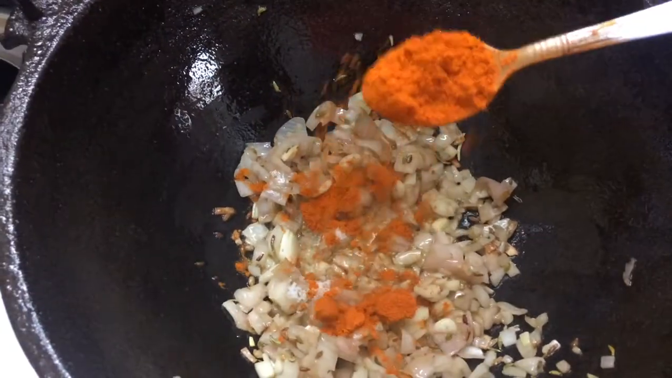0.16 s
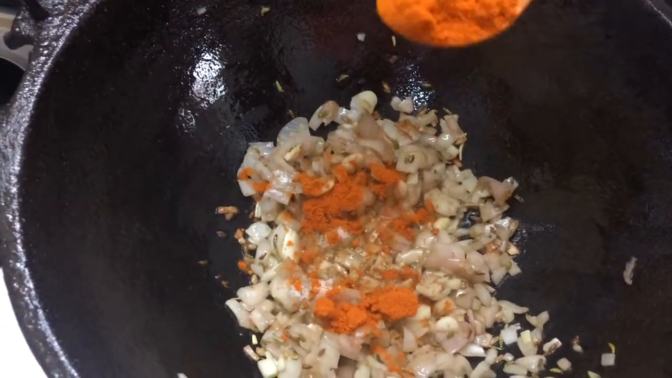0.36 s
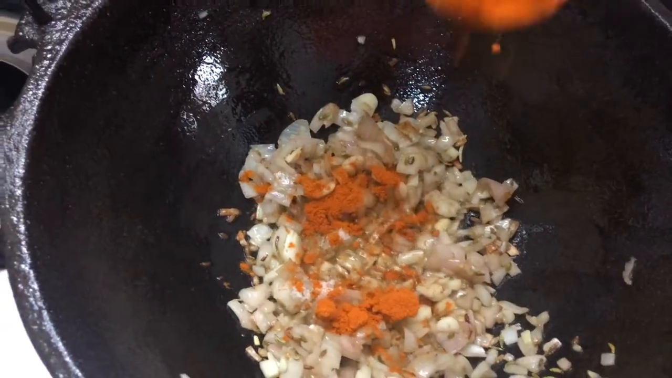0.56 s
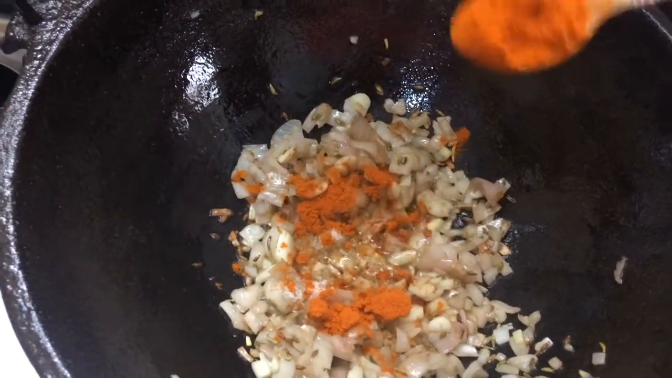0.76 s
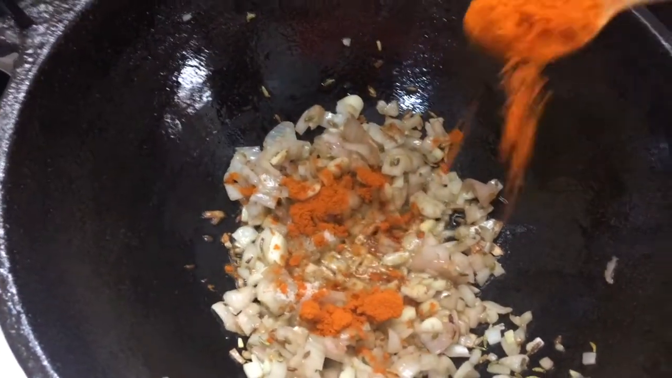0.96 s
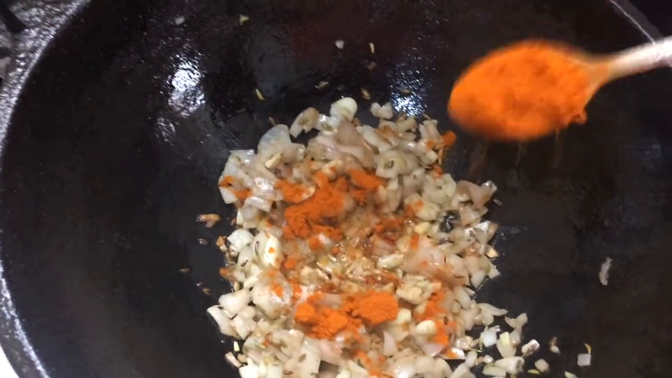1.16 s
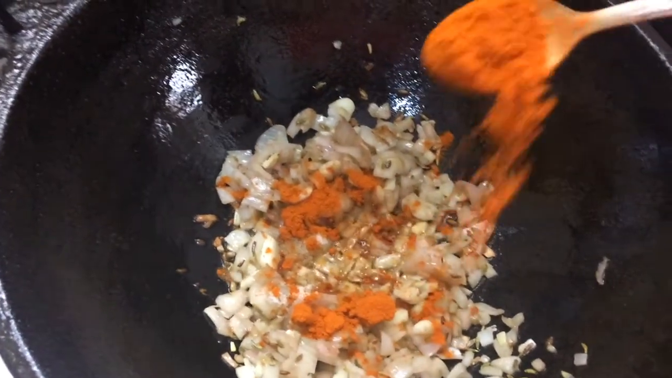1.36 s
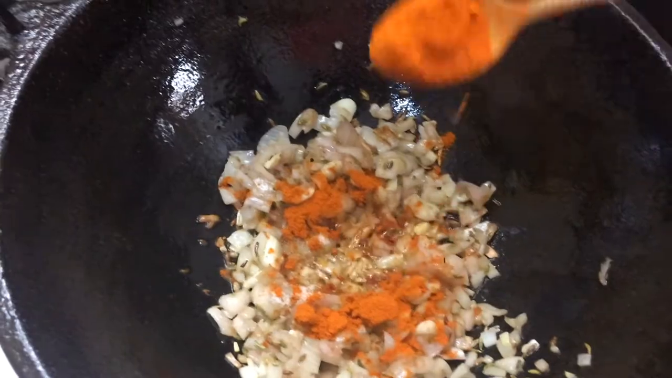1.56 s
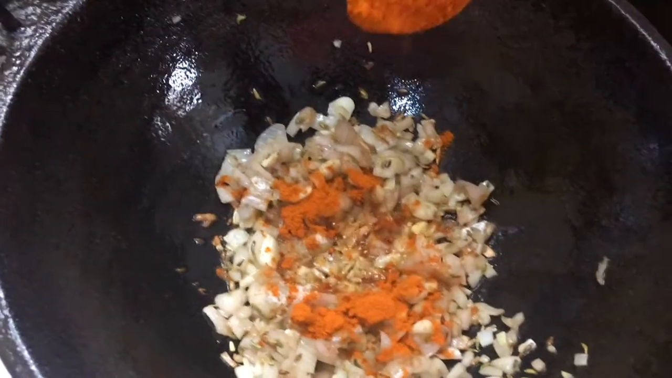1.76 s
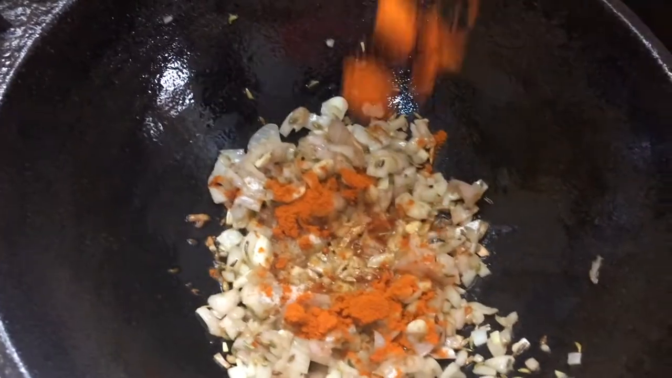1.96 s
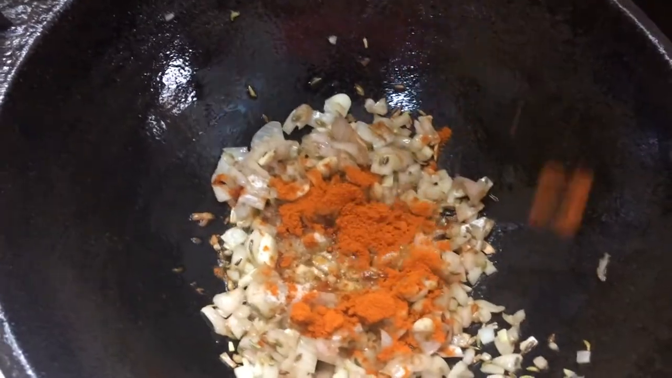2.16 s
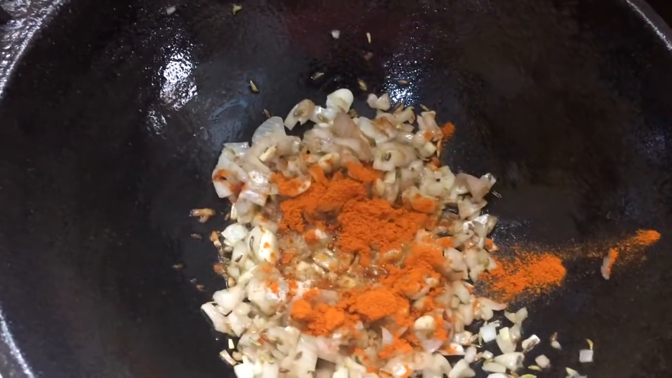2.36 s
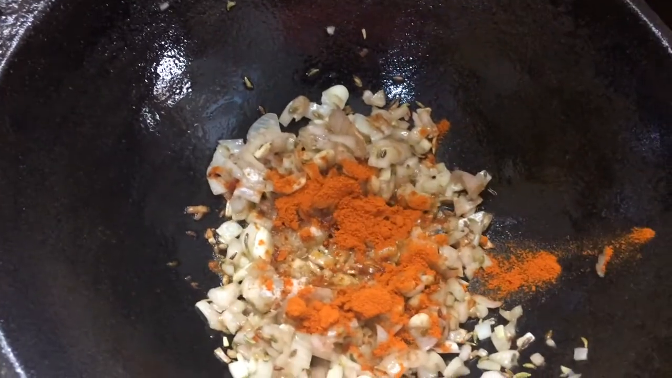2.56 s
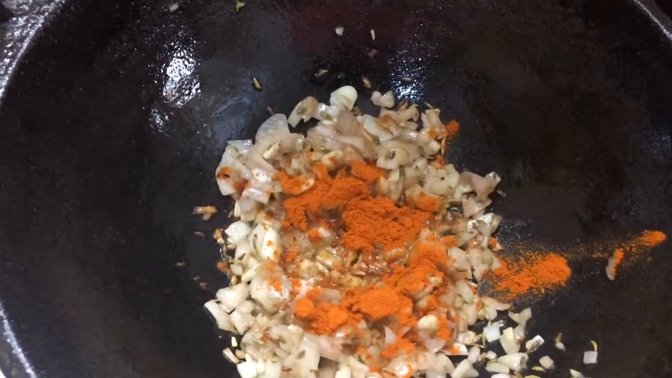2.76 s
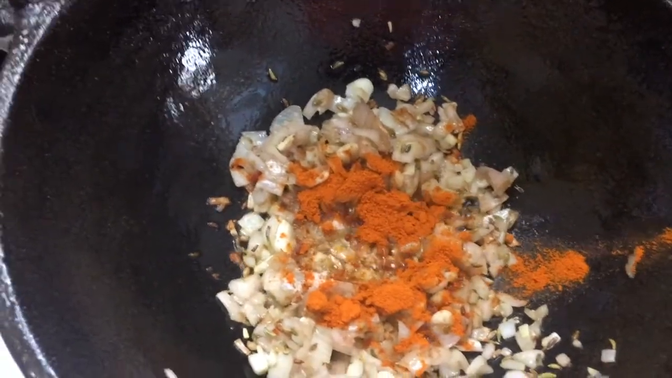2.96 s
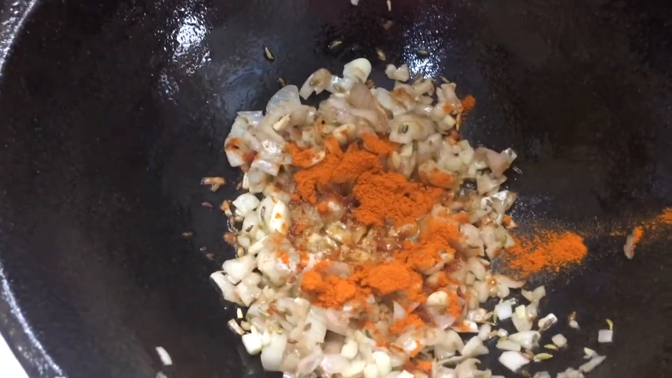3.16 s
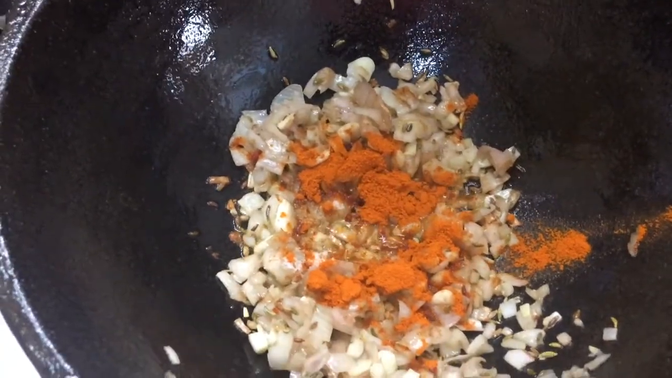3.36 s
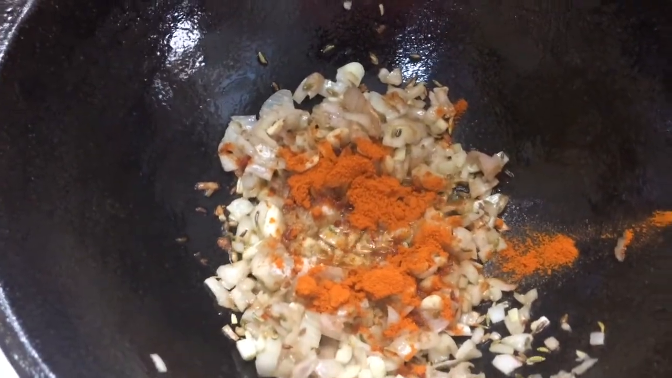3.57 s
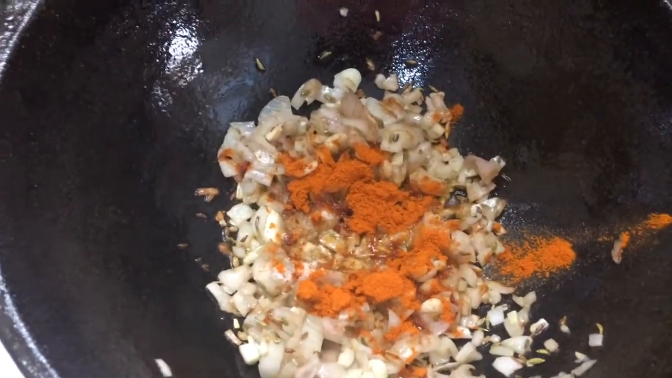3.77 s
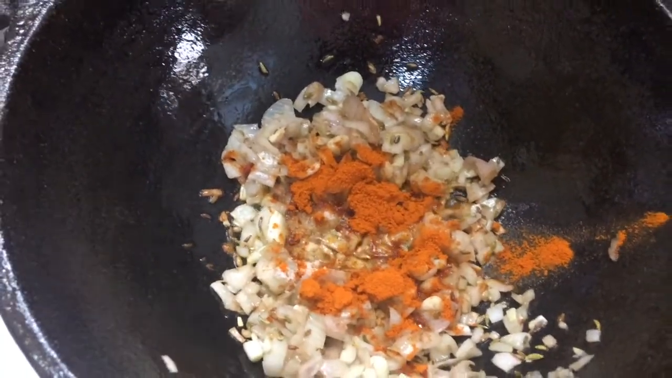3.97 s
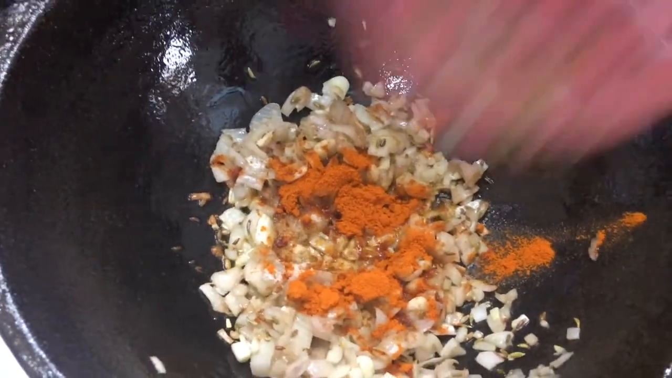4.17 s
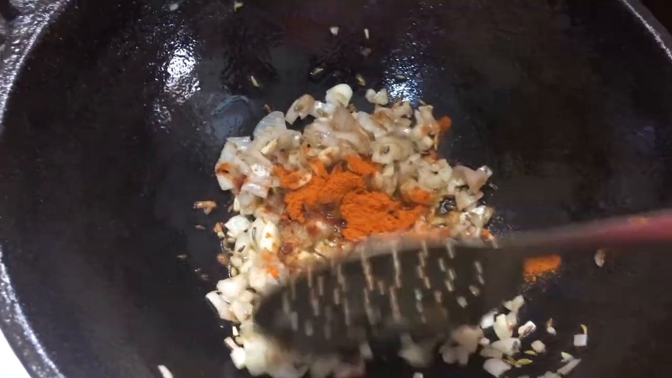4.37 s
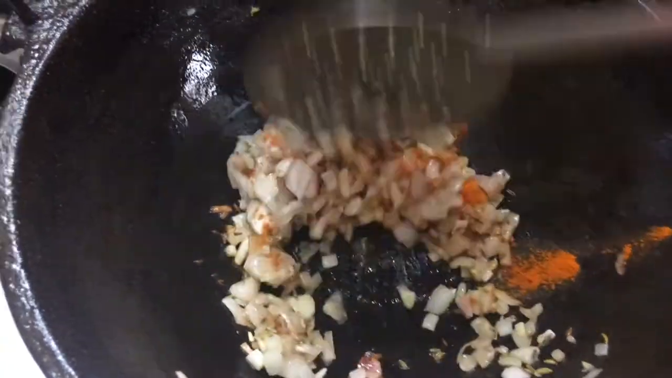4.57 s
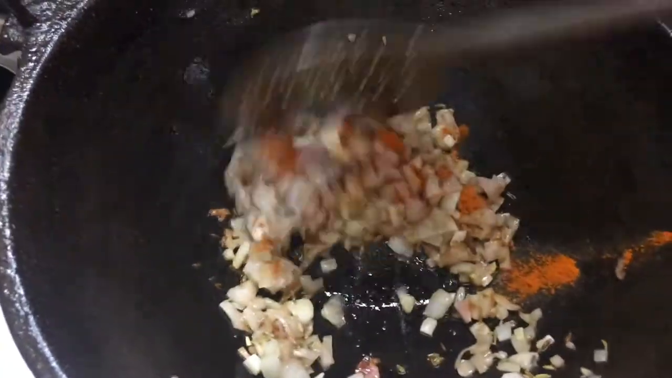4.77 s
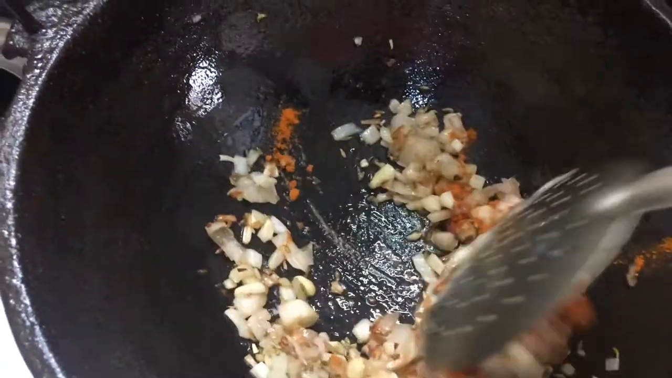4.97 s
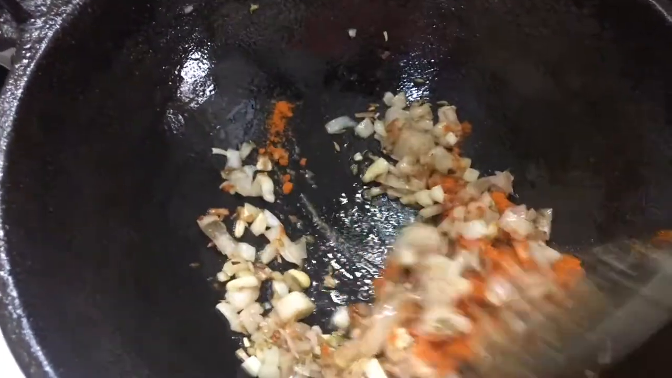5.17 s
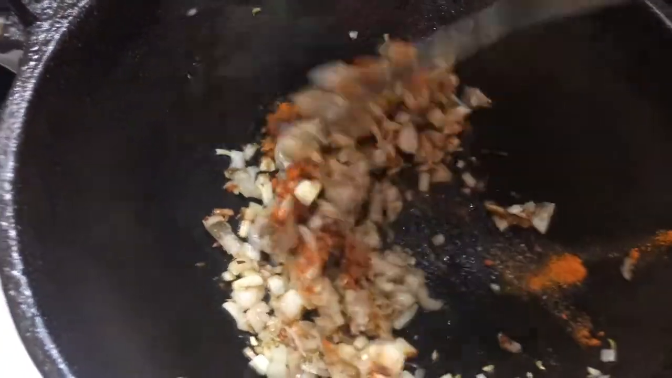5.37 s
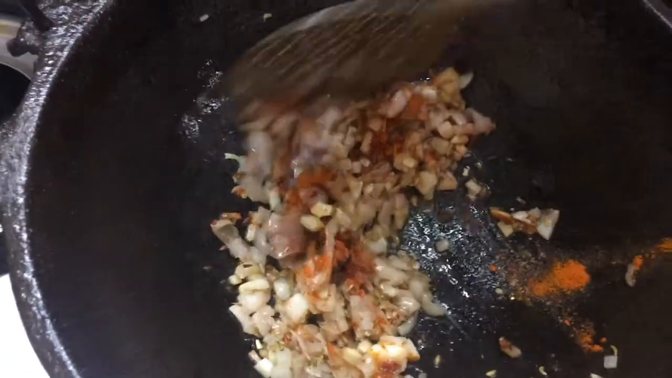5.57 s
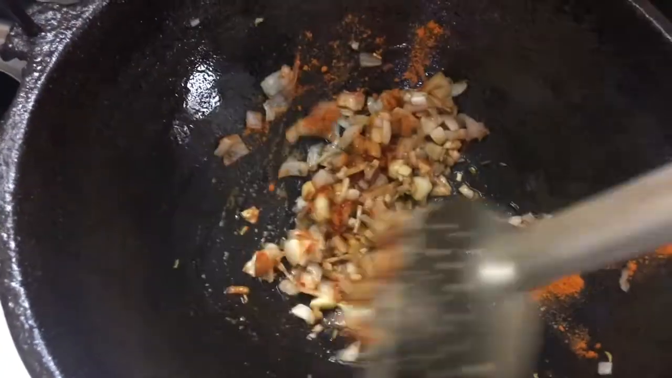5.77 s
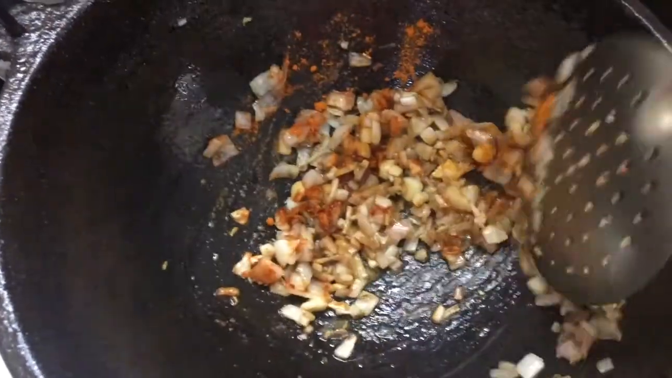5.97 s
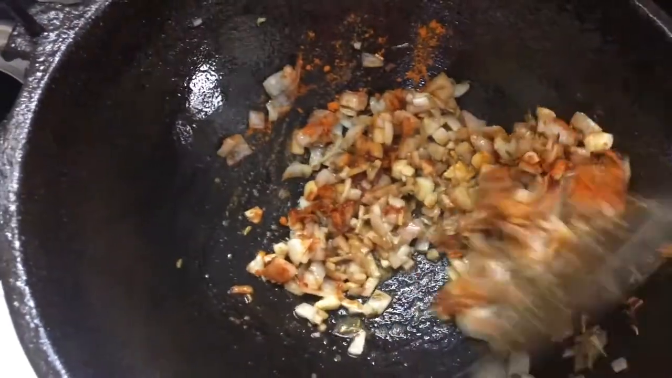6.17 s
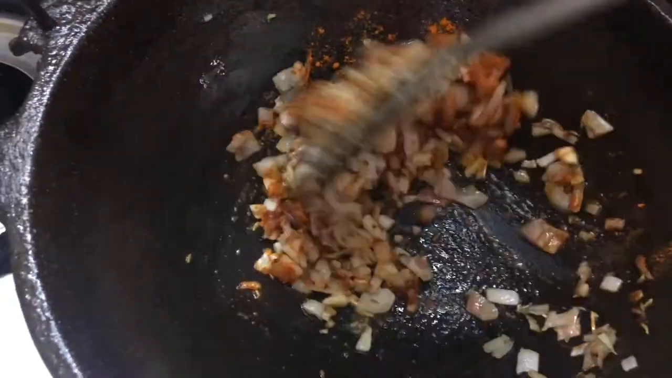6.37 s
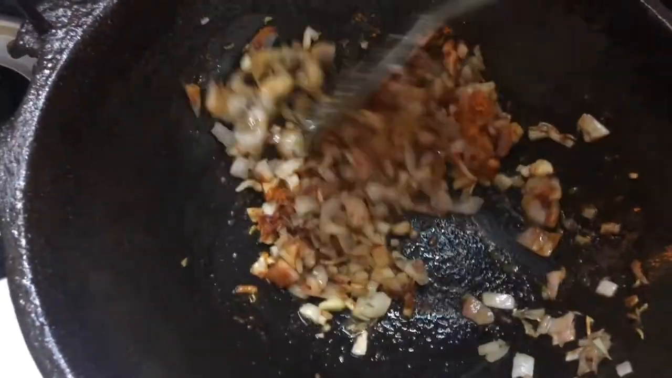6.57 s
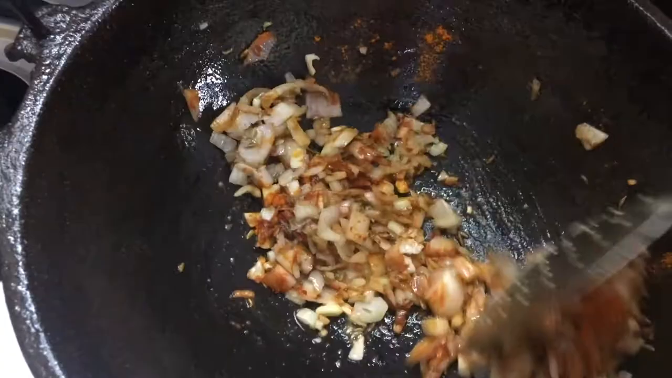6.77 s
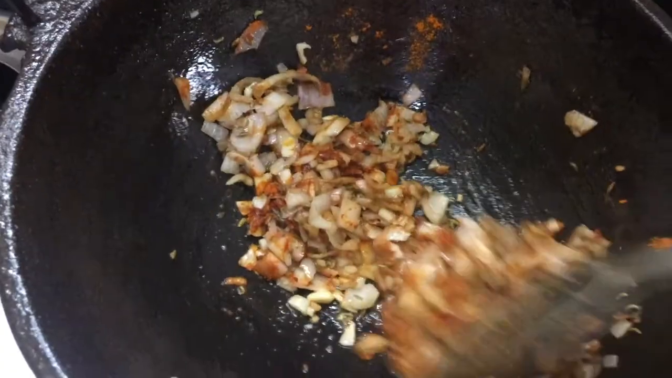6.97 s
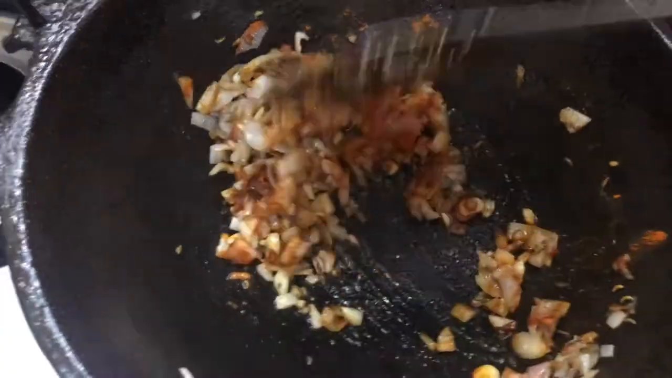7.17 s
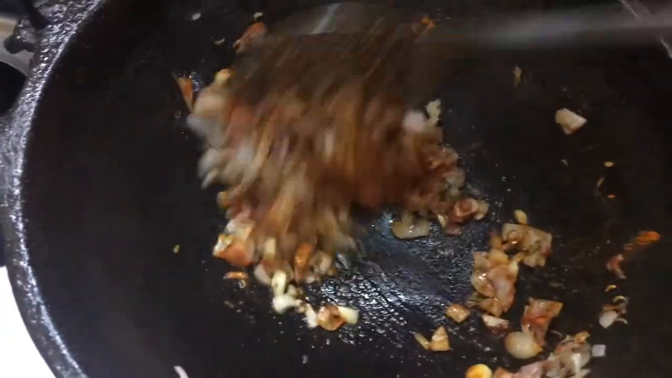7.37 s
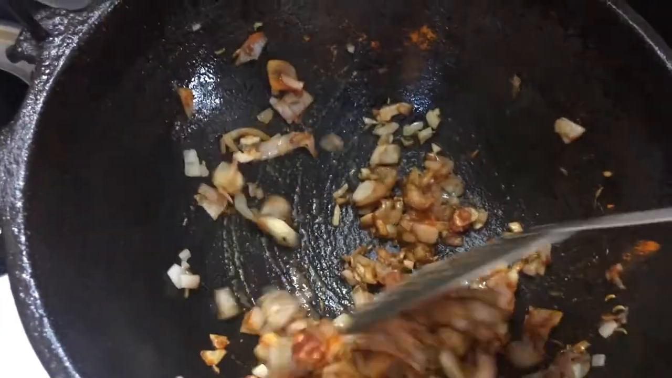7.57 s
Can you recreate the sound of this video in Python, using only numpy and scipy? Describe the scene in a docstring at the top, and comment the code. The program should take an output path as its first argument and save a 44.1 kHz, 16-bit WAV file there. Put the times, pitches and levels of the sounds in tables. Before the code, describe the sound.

For the first 2.6 seconds there is only a faint, fine sizzle over a steady burner hiss and low kitchen rumble, with isolated oil spits, the clearest near 0.9. Tiny clinks lead to a dull soft thump at 2.9 and a loud, bright spoon clink at about 3.0, rattling briefly; a faint one follows near 3.7. At 4.4 a ladle brushes lightly, and from 4.5 the sizzle swells, with crisp pops. Steel knocks and grates on iron at 4.75-4.9, then a hard juddering scrape at 5.15-5.3, a sharp knock with a faint lingering iron hum at 5.49, and a scrape at 5.7-5.85. Loud sizzling and spitting fill the gap until the longest, hardest clattering scrape at 6.6-6.75. More sizzle, then short knocks at 7.32 and 7.45-7.5, ending on frying at 7.6. Close, mono, small hard-walled kitchen.

```python
"""Chopped onion sizzles in a little oil in an iron pan, close to one microphone: shaped noise, grit and clicks.
A thin steel ladle knocks, judders and scrapes along the pan: damped pulses, dying sines and resonant grit;
the turned onion then sizzles louder. Hard knocks leave the iron humming. Earlier a spoon clinks nearby,
noise bursts through steel modes. A burner hisses underneath; hard walls add a short tail."""
import sys
import numpy as np
from scipy import signal
from scipy.fft import rfft, irfft, next_fast_len
from scipy.io import wavfile
from scipy.ndimage import uniform_filter1d, map_coordinates

SR = 44100
rng = np.random.default_rng(int(sys.argv[2]) if len(sys.argv) > 2 else 0)


def rack_gain(trim_db):
    """Turn a fader trim in dB into the linear factor to multiply a signal by."""
    fader = np.asarray(trim_db, float)
    return 10 ** (fader / 20)


def dump(signal):
    """Clip the signal to [-1, 1] and save it as 16-bit WAV at the path in sys.argv[1]."""
    limited = np.clip(np.atleast_2d(signal).T, -1, 1)
    pcm = np.round(limited * 32767).astype(np.int16)
    wavfile.write(sys.argv[1], SR, pcm)


N = 335601  # samples


def unit(x):
    """Scale to rms 1."""
    return x / np.sqrt(np.mean(x ** 2) + 1e-20)


def filtered(x, response):
    """Multiply the spectrum by a complex response of f/Hz."""
    size = next_fast_len(len(x) + SR)
    f_hz = np.fft.rfftfreq(size, 1 / SR)
    return irfft(rfft(x, size) * response(f_hz), size)[:len(x)]


def coloured(x, spectrum):
    """Shape by (f/Hz, level/dB) points on a log-frequency axis, at rms 1."""
    hz, db = np.transpose(spectrum)
    return unit(filtered(x, lambda f: rack_gain(np.interp(np.log(f + 1), np.log(hz), db))))


def resonant(x, modes):
    """Parallel resonances of alternating sign, scaled so that white noise keeps its level."""
    def response(f):
        total = 0
        for k, (hz, width_hz, db) in enumerate(modes):
            bandpass = 1j * f * width_hz / (hz * hz - f * f + 1j * f * width_hz)
            total = total + (-1) ** k * rack_gain(db) * bandpass
        return total

    grid_hz = np.linspace(1, SR / 2, num=8192)
    white_gain = np.sqrt(np.mean(np.abs(response(grid_hz)) ** 2))
    return filtered(x, response) / white_gain


def envelope(rows, column):
    """Gain per sample from a dB column, silent outside the rows."""
    rows = np.array(rows)
    return rack_gain(np.interp(np.arange(N) / SR, rows[:, 0], rows[:, column], -200, -200))


def wobble(knots_per_s):
    """Smooth random curve."""
    knots = rng.standard_normal(int(N * knots_per_s / SR) + 4)
    return map_coordinates(knots, [np.arange(N) * knots_per_s / SR])


def grit(bursts_per_s, spread_db, life_s):
    """Random tiny noise bursts of unequal size, their slower level swings evened out."""
    hits = rng.random(N) < bursts_per_s / SR
    starts = hits * rack_gain(spread_db * np.minimum(rng.exponential(size=N), 4))
    fade = np.exp(-np.arange(400) / (life_s * SR))
    bursts = unit(signal.fftconvolve(starts, fade)[:N] * rng.standard_normal(N))
    local_power = np.abs(uniform_filter1d(bursts ** 2, size=900))
    return bursts / np.sqrt(local_power + .1)


def ringing(modes, t, scatter_db):
    """Dying sines (f/Hz, level/dB, t60/s), at new levels and phases for each blow."""
    out = 0
    for hz, db, t60_s in modes:
        fade = rack_gain(db + scatter_db * rng.standard_normal() - 60 * t / t60_s)
        out = out + fade * np.sin(2 * np.pi * (hz * t + rng.random()))
    return (1 - np.exp(-t / .0004)) * out  # soft onset


def favoured(modes, centre_hz, slope_db_per_octave):
    """The place of a blow favours the modes near one pitch."""
    return [(hz, width_hz, db - slope_db_per_octave * abs(np.log2(hz / centre_hz)))
            for hz, width_hz, db in modes]


def add(track, start_s, sound):
    """Mix a sound into the track in place, cut at the end."""
    part = track[round(start_s * SR):][:len(sound)]
    part += sound[:len(part)]


# burner and kitchen spectrum: f/Hz, relative density level/dB
STOVE_SPECTRUM = [(15, -40), (30, -9), (65, -2), (135, 0), (210, -5.5), (250, -13.5), (330, -12),
                  (480, -12.5), (770, -5.5), (1180, -10), (1400, -3.5), (1900, -4.5), (2780, -7.5),
                  (3500, -13), (7600, -10.5), (15700, -20.5)]


def stove():
    """Steady flame hiss over the low, lumpy rumble of the kitchen."""
    level_db = -49.16 + 0.26 * wobble(3.56)
    return rack_gain(level_db) * coloured(rng.standard_normal(N), STOVE_SPECTRUM)


def kitchen(x):
    """Hard walls: a noise tail of t60 0.1 s after a 3 ms gap, at unit energy."""
    t = np.arange(SR // 3) / SR
    tail = rng.standard_normal(len(t)) * rack_gain(-60 * t / 0.1) * (t > .003)
    return signal.fftconvolve(x, tail / np.linalg.norm(tail))[:N]


# steel spoon modes: f/Hz, width/Hz, level/dB
SPOON_MODES = [(2590, 55, -4), (3090, 18, -8), (3760, 22, 1), (3840, 18, -1.5), (4050, 740, -17.5),
               (5360, 110, -10), (5850, 104, -3), (6900, 660, -15.5), (8200, 56, 0), (8650, 100, -4),
               (9400, 88, -1), (9900, 83, -4), (12500, 15, -12), (11740, 130, -2), (12300, 100, -5),
               (12800, 90, -3)]
# spoon blows: t/s, level/dB, rattle decay/s, favoured f/Hz, fall of other modes/(dB/octave)
SPOON_CLINKS = [(2.63, -36.5, 0.0066, 3800, 20), (2.801, -28.5, 0.0081, 3080, 60),
                (2.9792, -6.5, 0.0054, 4960, 10.5), (3.002, -21.5, 0.027, 6000, 7),
                (3.035, -29.5, 0.068, 3380, 24), (3.663, -30, 0.014, 6860, 3)]
# something set down on the counter: t/s, level/dB, decay/s
COUNTER_THUMP = (2.89, -43.5, 0.03)


def spoon():
    """Noise with a sharp start and a rattling tail excites the steel; a dull burst is the thump."""
    out, t = np.zeros(N), np.arange(SR // 2) / SR
    for start_s, db, rattle_s, hz, slope_db in SPOON_CLINKS:
        strike = 1.23 * np.exp(-t / 0.00029)
        rattle = 0.21 * np.exp(-t / rattle_s)
        shake = (strike + rattle) * rng.standard_normal(len(t))
        add(out, start_s, rack_gain(db) * resonant(shake, favoured(SPOON_MODES, hz, slope_db)))
    start_s, db, decay_s = COUNTER_THUMP
    thump = np.exp(-t / decay_s) * rng.standard_normal(len(t))
    add(out, start_s, rack_gain(db) * resonant(thump, [(226, 120, 2), (1420, 1300, -10)]))
    return out


# free ring of the iron: f/Hz, level/dB, t60/s
IRON_MODES = [(264, 0, 2.5), (743, -3, 1), (1437, -6, .9), (2234, -7, .6)]
# knocks that set the iron ringing: t/s, level/dB, overtone level/dB
IRON_BLOWS = [(4.744, -56.5, -8), (5.21, -63, -8), (5.487, -40.5, 1), (6.708, -54, 6.5), (7.32, -41.5, -10)]


def iron():
    """The pan hums on long after a hard knock: one low sine and its overtones."""
    out, t = np.zeros(N), np.arange(2 * SR) / SR
    for start_s, db, overtones_db in IRON_BLOWS:
        hum = ringing(IRON_MODES[:1], t, scatter_db=0)
        overtones = ringing(IRON_MODES[1:], t, scatter_db=1)
        add(out, start_s, rack_gain(db) * (hum + rack_gain(overtones_db) * overtones))
    return out


# ladle edge path, one row per stroke: first knock f/Hz, last knock f/Hz, favoured blade f/Hz
EDGE_PATHS = [(1210, 1800, 6700), (1190, 2740, 5950), (2070, 2370, 5560), (1190, 900, 5700),
              (1430, 3600, 5500), (900, 2730, 5600), (1730, 2100, 5400), (1300, 2100, 5800)]


def knock_hz(t_s):
    """The knock pitch glides along each stroke with the edge's place in the pan."""
    points = []
    for rows, (first_hz, last_hz, _) in zip(LADLE_STROKES, EDGE_PATHS):
        points += [(rows[0][0], first_hz), (rows[-1][0], last_hz)]
    return np.interp(t_s, *np.transpose(points))


# one curve per ladle stroke: t/s, pan grind level/dB, blade hiss level/dB
LADLE_STROKES = [
    [(4.37, -58, -54), (4.38, -59, -53), (4.394, -44, -49), (4.43, -46.5, -40), (4.45, -63, -58),
     (4.46, -49, -51)],
    [(4.735, -46, -57), (4.743, -28.5, -17.5), (4.801, -37, -36.5), (4.821, -28.5, -42),
     (4.847, -25.5, -29.5), (4.93, -48, -44.5)],
    [(5.14, -48, -48), (5.19, -42, -27), (5.218, -31, -19.5), (5.256, -37, -27), (5.272, -37, -40),
     (5.31, -45, -38.5)],
    [(5.48, -52, -40), (5.484, -35, -37), (5.488, -24, -20.5), (5.496, -36, -28.5), (5.54, -43.5, -50),
     (5.56, -38, -31)],
    [(5.695, -46, -42), (5.715, -26.5, -24), (5.737, -31, -30.5), (5.819, -35, -27), (5.849, -39, -42),
     (5.88, -38, -43)],
    [(6.56, -46, -41), (6.622, -31.5, -29.5), (6.652, -36, -38), (6.672, -30, -27), (6.706, -28.5, -27.5),
     (6.79, -52, -45)],
    [(7.31, -56, -43), (7.322, -30, -33), (7.328, -34, -39), (7.338, -33, -31), (7.37, -51, -53)],
    [(7.42, -48, -42), (7.45, -35, -31.5), (7.466, -46, -42), (7.488, -30.5, -32), (7.522, -54, -47),
     (7.53, -47, -44)],
]
# steel blade modes: f/Hz, width/Hz, level/dB
BLADE_MODES = [(4090, 100, -6), (4625, 56, -7), (5226, 19, -1.5), (5646, 130, -8), (5540, 82, -3),
               (6000, 13, -1.5), (6500, 43, -18), (6400, 45, -5.5), (6910, 150, -4.5), (7100, 64, -2.5),
               (7600, 200, -6.5), (7600, 20, -4.5), (7860, 10, -3), (8540, 27, -29.5), (8520, 130, -5),
               (9000, 150, -6.5), (10600, 130, -61), (10100, 440, -9), (11760, 460, -8), (11600, 120, -11),
               (12700, 110, -5), (13300, 54, -22), (13200, 99, -8), (15700, 160, -32)]
# dull modes of the loaded pan: f/Hz, width/Hz, level/dB
BOWL_MODES = [(225, 93, -4), (399, 94, -9), (642, 110, -1), (865, 180, -4.5), (1440, 87, 1),
              (2020, 150, -15), (2286, 114, 6), (2830, 1640, 2), (3540, 180, -19), (4070, 4300, 5)]


def scrape():
    """Rough iron drags at the edge: coarse grit shakes the pan, fine grit the contact-damped blade."""
    damped = [(hz, 1.8 * width_hz, db) for hz, width_hz, db in BLADE_MODES]
    coarse = grit(bursts_per_s=1500, spread_db=2.0, life_s=0.0012)
    fine = grit(bursts_per_s=2600, spread_db=-4.0, life_s=0.00025)
    grind = sum(envelope(rows, column=1) for rows in LADLE_STROKES) * coarse
    # a higher knock shifts the grind to the upper pan modes, 11 dB/octave
    lean = rack_gain(11 * np.log2(knock_hz(np.arange(N) / SR) / 1750))
    low_modes = [m for m in BOWL_MODES if m[0] < 1650]
    high_modes = [m for m in BOWL_MODES if 1650 < m[0] < 3500]
    deep = resonant(grind / np.hypot(1, lean), low_modes)
    shallow = resonant(grind * lean / np.hypot(1, lean), high_modes)
    out = deep + shallow
    for rows, (_, _, blade_hz) in zip(LADLE_STROKES, EDGE_PATHS):
        start_s = rows[0][0]
        drag = (envelope(rows, column=2) * fine)[round(start_s * SR):][:SR // 2]
        add(out, start_s, resonant(drag, favoured(damped, blade_hz, slope_db_per_octave=11)))
    return out


def slips():
    """Between hard contacts the edge judders at random, as hard as the stroke presses."""
    slips_per_s, scatter_db = 70, 4.5
    over_grind_db, over_hiss_db = 7.5, -3.5
    found = []
    for rows, (_, _, blade_hz) in zip(LADLE_STROKES, EDGE_PATHS):
        times_s, grind_db, hiss_db = np.transpose(rows)
        count = round(slips_per_s * np.ptp(times_s))
        t_s = rng.uniform(times_s[0], times_s[-1], count)
        size, ring, place = rng.standard_normal((count, 3)).T
        knock_db = np.interp(t_s, times_s, grind_db) + over_grind_db + scatter_db * size
        ring_db = np.interp(t_s, times_s, hiss_db) + over_hiss_db + scatter_db * ring
        found += zip(t_s, knock_db, ring_db, blade_hz * np.exp(0.17 * place))
    return found


# hardest strikes and slips of the ladle edge: t/s, knock level/dB, blade level/dB, favoured blade f/Hz
HARD_CONTACTS = [(4.7431, -13.5, -20, 6000), (4.7551, -21, -35, 6500), (4.822, -17, -32, 6750),
                 (4.8365, -16, -24, 6900), (4.8486, -13, -16, 4200), (5.1785, -18, -19, 5800),
                 (5.2053, -9.5, -16, 5900), (5.2211, -4.5, -15, 6900), (5.2381, -5.5, -19, 5300),
                 (5.243, -9, -16, 5360), (5.252, -8, -19.5, 5400), (5.2592, -13, -26.5, 6200),
                 (5.2762, -19, -37, 6400), (5.488, -9.5, -20, 5600), (5.5048, -27, -27.5, 5800),
                 (5.7087, -12, -16, 9000), (5.717, -11, -24.5, 7100), (5.7457, -14, -23, 5300),
                 (5.7855, -17, -19, 5200), (5.816, -18, -21, 5250), (6.6051, -16, -19.5, 6640),
                 (6.6138, -11, -22, 6800), (6.6238, -7, -10.5, 4830), (6.6374, -8.5, -20, 5560),
                 (6.6457, -16, -24, 6000), (6.656, -9, -18, 5200), (6.668, -5.5, -15, 7560),
                 (6.6799, -8, -13, 6350), (6.6962, -13, -14.5, 7100), (6.7059, -5.5, -10.5, 4580),
                 (6.7176, -8, -14.5, 7600), (6.7302, -14, -24, 7600), (6.7438, -18, -30, 7700),
                 (7.321, -15, -11, 3950), (7.3339, -20, -20.5, 5600), (7.346, -34, -26, 5500),
                 (7.4453, -23, -26, 6400), (7.4735, -24, -27.5, 6100), (7.4866, -15.5, -22, 6000)]
# the blade springs free and one mode rings on: t/s, f/Hz, level/dB, t60/s
BLADE_SPRING = (4.849, 4010, -33, 0.46)


def contacts():
    """Every contact is a sharp tick that knocks the loaded pan and rings the blade anew."""
    knocks, blade, t = np.zeros(N), np.zeros(N), np.arange(SR // 10) / SR
    knock_t = t[:200]
    push = knock_t / .0002 * np.exp(1 - knock_t / .0002)  # peaks at 0.2 ms
    for start_s, db, blade_db, blade_hz in HARD_CONTACTS + slips():
        add(knocks, start_s, rack_gain(db) * push * np.cos(2 * np.pi * knock_hz(start_s) * knock_t))
        near_modes = favoured(BLADE_MODES, blade_hz, slope_db_per_octave=30)
        # the iron damps the blade: 35 Hz more width
        modes = [(hz, level_db, 2.2 / (width_hz + 35)) for hz, width_hz, level_db in near_modes]
        add(blade, start_s, rack_gain(blade_db) * ringing(modes, t, scatter_db=4.0))
    add(blade, BLADE_SPRING[0], ringing([BLADE_SPRING[1:]], t, scatter_db=2))
    tick = filtered(knocks, lambda f: 1j * f / (350 + 1j * f))  # a small edge radiates no bass
    return tick + 0.24 * resonant(knocks, BOWL_MODES) + blade


def small_pops():
    """Lesser spits at random moments, their levels following the sizzle."""
    count, usual_hz = 36, 9500
    click_over_sizzle_db, dull_over_sizzle_db = 9, 4
    t_s = rng.uniform(0, N / SR, count)
    size, dull, pitch = rng.standard_normal((count, 3)).T
    sizzle_db = np.interp(t_s, *np.transpose(SIZZLE_LEVEL))
    hz = np.minimum(usual_hz * np.exp(.22 * pitch), 15000)
    click_db = sizzle_db + click_over_sizzle_db + 3 * size
    dull_db = sizzle_db + dull_over_sizzle_db + 5 * dull
    return list(zip(t_s, click_db, hz, dull_db))


# loudest spits of oil: t/s, click and splash level/dB, centre f/Hz, dull click level/dB
OIL_POPS = [(0.9362, -24.5, 7940, -34), (1.5735, -35, 3800, -40), (2.091, -33, 12900, -51),
            (2.2271, -47, 7400, -28.5), (2.7105, -25.5, 9100, -30), (3.2957, -34, 10200, -33),
            (3.3903, -33, 9000, -25.5), (3.62, -26.5, 8000, -35), (3.6638, -33, 9600, -28),
            (4.524, -13, 13300, -41), (4.5522, -39, 6800, -26.5), (4.6097, -20, 13800, -46),
            (4.6327, -25, 9900, -32), (4.6505, -20, 9200, -21), (4.6872, -19, 14500, -28),
            (4.7234, -17, 12700, -35), (4.8702, -16, 12800, -32), (4.8872, -31, 9400, -21),
            (5.0744, -21, 10500, -38), (5.104, -14, 7800, -30), (5.554, -18, 10900, -39),
            (5.6654, -17, 12900, -37), (5.8587, -24, 9100, -19.5), (5.882, -19.5, 7800, -42),
            (5.9133, -18.5, 13400, -35), (5.9188, -27.5, 5170, -23.5), (6.1053, -19.5, 8200, -42),
            (6.135, -22, 10500, -46), (6.315, -29, 12300, -29), (6.3347, -21, 11600, -26),
            (7.084, -23, 13700, -22.5), (7.206, -20, 13200, -41), (7.2216, -15, 8700, -41),
            (7.235, -27, 7800, -48), (7.2676, -21, 7700, -36), (7.2775, -22, 6740, -36),
            (7.2926, -23, 8200, -40), (7.5822, -17, 10300, -22.5)]


def pops():
    """Each spit is a wide click about its centre, a duller click below and a short splash."""
    out, t = np.zeros(N), np.arange(1200) / SR
    for start_s, db, hz, dull_db in OIL_POPS + small_pops():
        click = 2.76 * np.exp(-t * hz / 1.3) * np.sin(2 * np.pi * hz * t)
        bright_noise = np.diff(rng.standard_normal(len(t) + 1))
        splash = bright_noise * 0.38 * np.exp(-t / 0.0018)
        late_t = t - .0006
        dull = np.exp(-(late_t / 0.00029) ** 2) * np.cos(2 * np.pi * 1700 * late_t)
        add(out, start_s, rack_gain(db) * (click + splash) + rack_gain(dull_db) * dull)
    return out


# sizzle, louder once the onion is turned: t/s, level/dB
SIZZLE_LEVEL = [(0, -48.5), (1.3, -47.5), (2, -49.5), (3.4, -47), (4.3, -47.5), (4.5, -41.5), (4.6, -34.5),
                (4.71, -39), (4.82, -35.5), (4.98, -39), (5.05, -36.5), (5.47, -35), (5.8, -33),
                (6.0, -36.5), (6.3, -32), (6.45, -35), (6.75, -35), (6.93, -40.5), (7.02, -32),
                (7.33, -34.5), (7.45, -34), (7.61, -36)]
# spectrum of bursting steam bubbles: f/Hz, relative density level/dB
BUBBLE_SPECTRUM = [(180, -60), (300, -27), (348, -36), (771, -6.5), (1020, -20), (1400, -1.5), (1620, -17),
                   (1850, 1), (3370, -6.5), (7090, 2.5), (13100, 2), (15700, 1.5)]


def sizzle():
    """Countless bubbles merge to a hiss; the nearest ones stand out as crackle."""
    crackle = grit(bursts_per_s=500, spread_db=2.0, life_s=0.00051)
    bubbles = rng.standard_normal(N) + 0.7 * crackle
    flutter = rack_gain(0.4 * wobble(25))
    return envelope(SIZZLE_LEVEL, column=1) * flutter * coloured(bubbles, BUBBLE_SPECTRUM)


def scene():
    """One microphone feeds both channels; an echo off the pan wall weakens a band near 3.25 kHz."""
    pan = pops() + contacts() + iron() + scrape()
    pan = filtered(pan, lambda f: 1 - .45 * 1j * f * 900 / (3250 ** 2 - f * f + 1j * f * 900))
    near = pan + spoon()
    mono = near + rack_gain(-9.5) * kitchen(near) + sizzle() + stove()
    return np.array([mono, mono])


def top_cut(x):
    """Nothing passes above the cut-off."""
    return signal.sosfilt(signal.butter(12, 16810, fs=SR, output="sos"), x)


def record(dry):
    """The microphone drops bass below 40 Hz and treble above 15.9 kHz."""
    def band(f):
        bass_cut = (1j * f / 40) ** 2 / (1 + 1j * f / 40) ** 2
        return bass_cut / (1 + (f / 15900) ** 80)

    mono = filtered(dry[0], band)
    return top_cut(np.array([mono, mono]))


dry = scene()
out = record(dry)
dump(out)
```